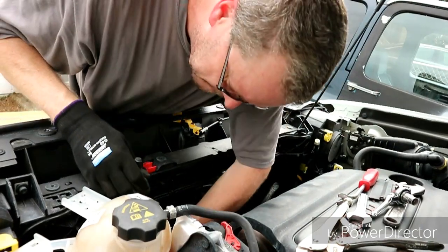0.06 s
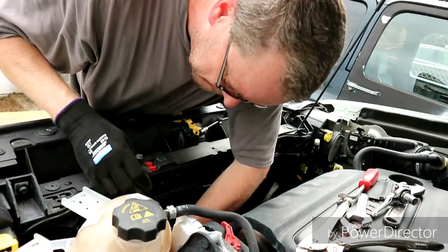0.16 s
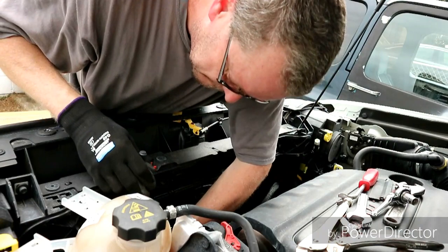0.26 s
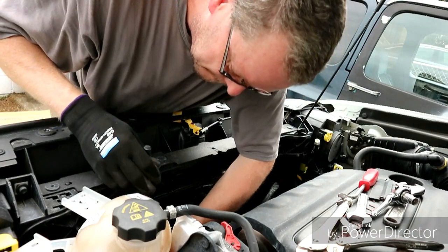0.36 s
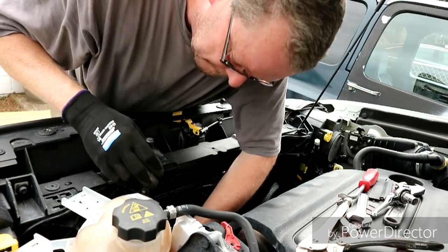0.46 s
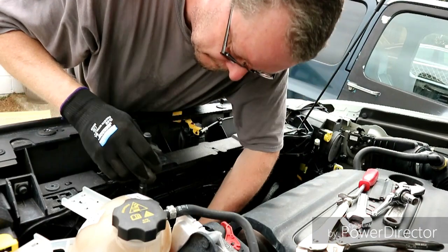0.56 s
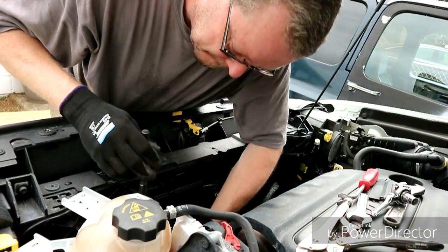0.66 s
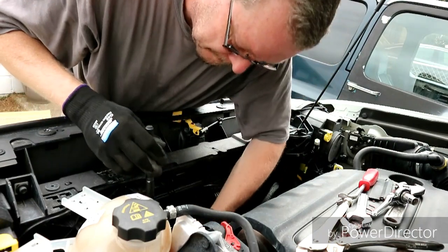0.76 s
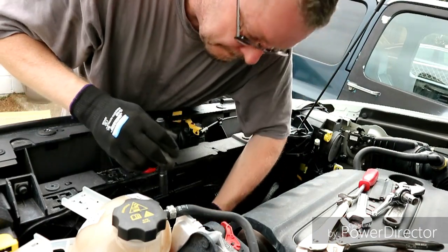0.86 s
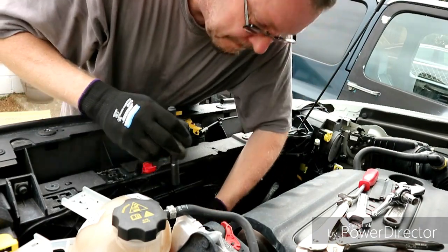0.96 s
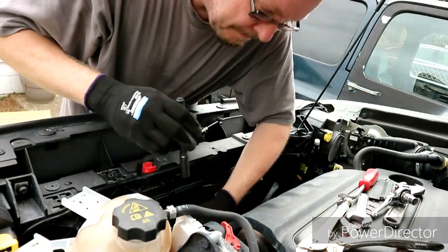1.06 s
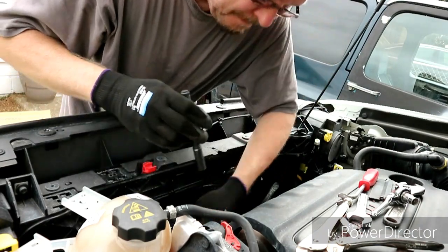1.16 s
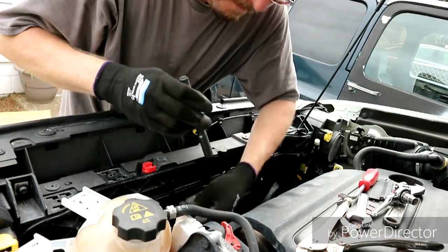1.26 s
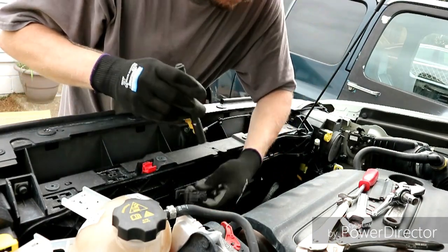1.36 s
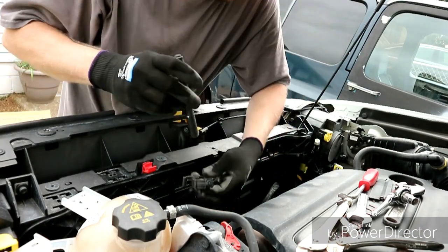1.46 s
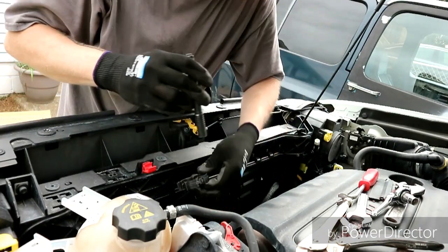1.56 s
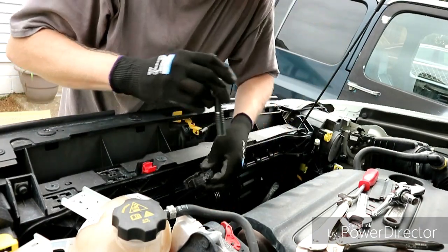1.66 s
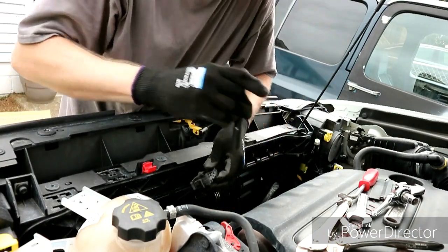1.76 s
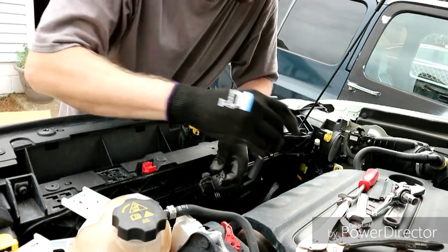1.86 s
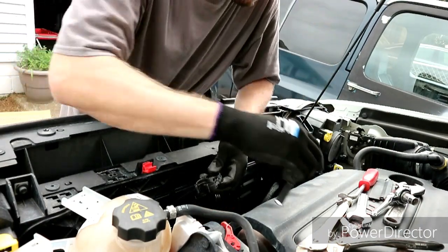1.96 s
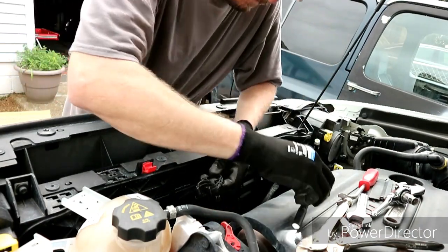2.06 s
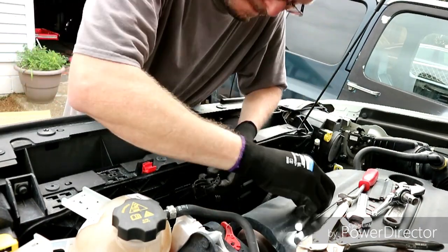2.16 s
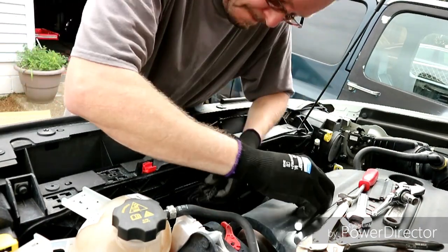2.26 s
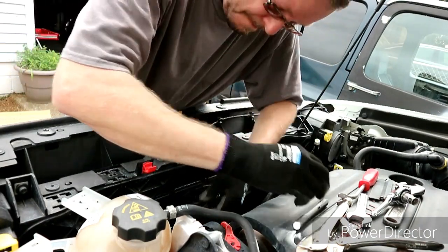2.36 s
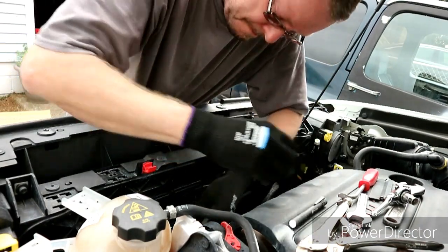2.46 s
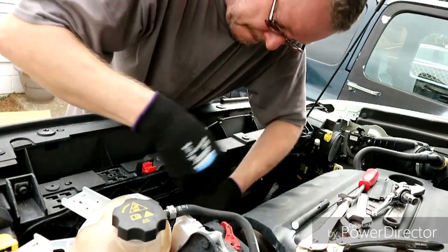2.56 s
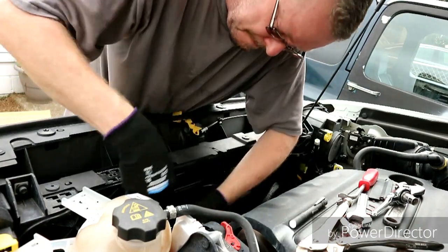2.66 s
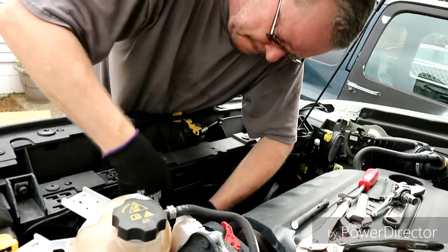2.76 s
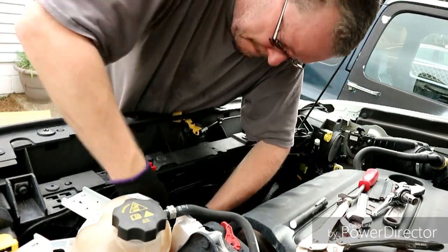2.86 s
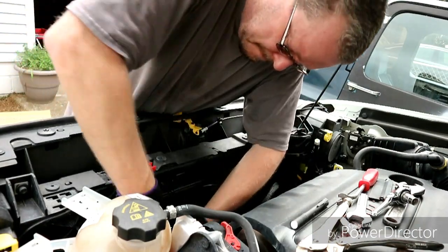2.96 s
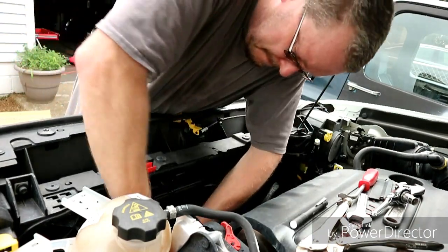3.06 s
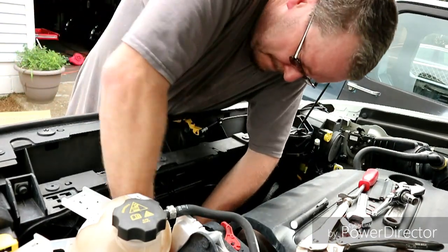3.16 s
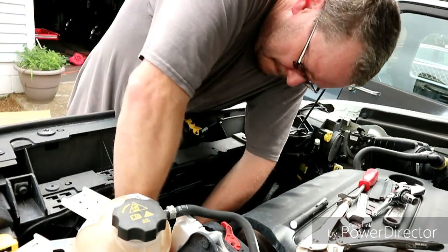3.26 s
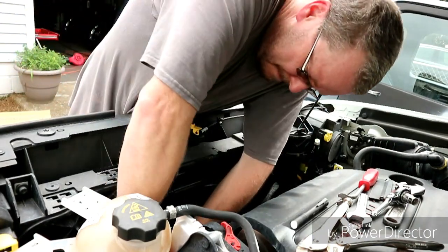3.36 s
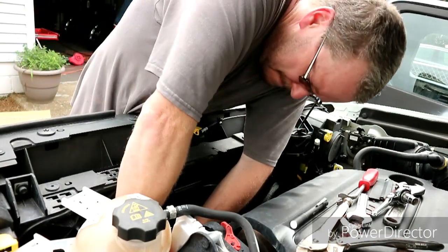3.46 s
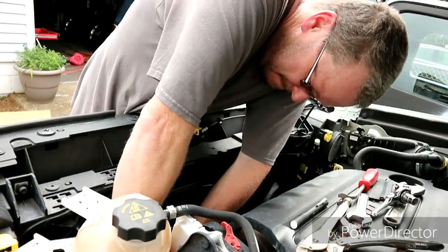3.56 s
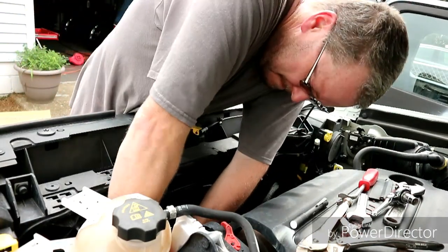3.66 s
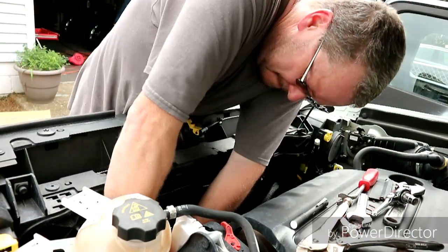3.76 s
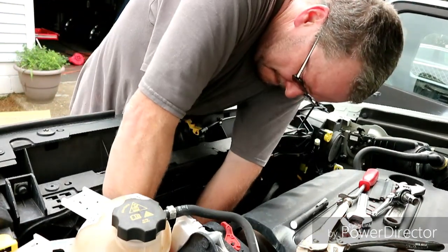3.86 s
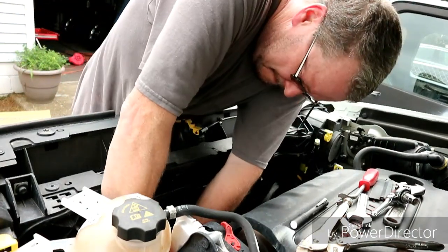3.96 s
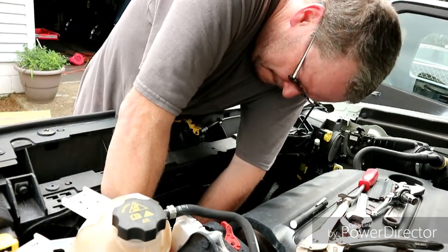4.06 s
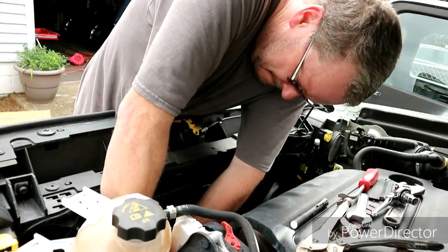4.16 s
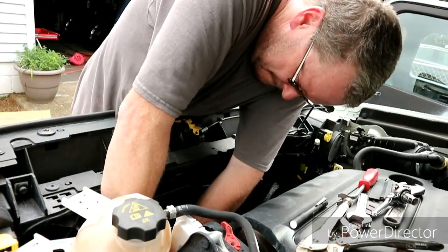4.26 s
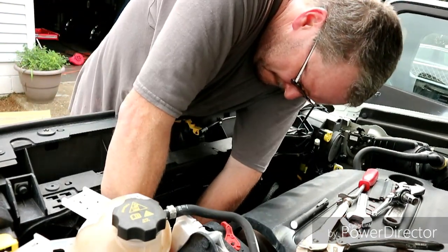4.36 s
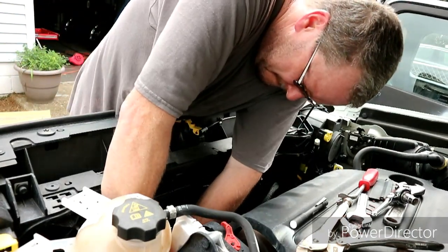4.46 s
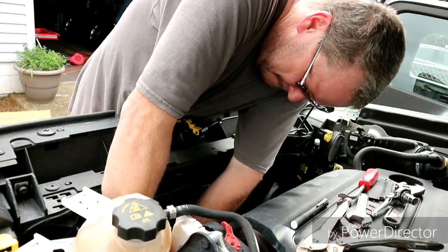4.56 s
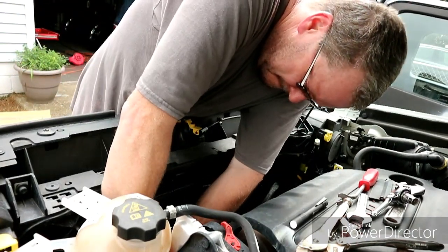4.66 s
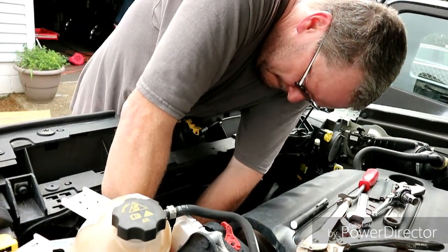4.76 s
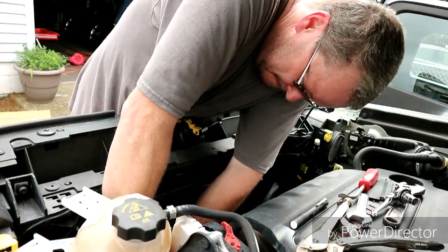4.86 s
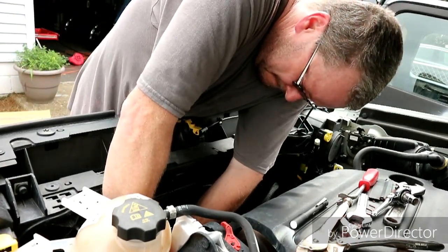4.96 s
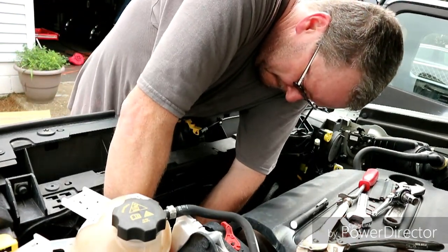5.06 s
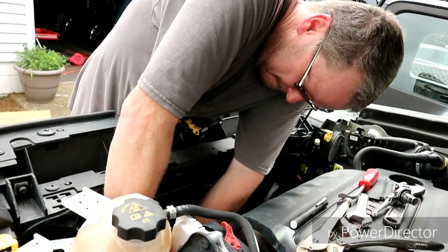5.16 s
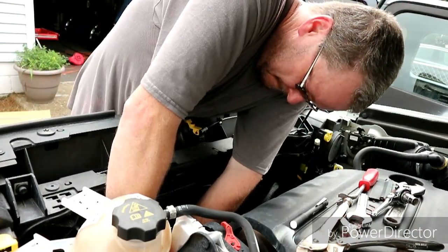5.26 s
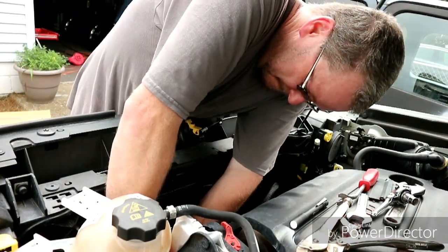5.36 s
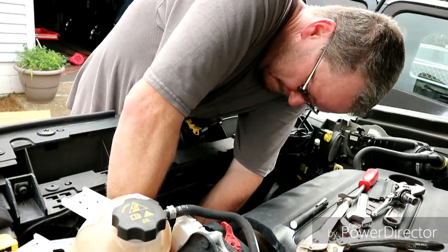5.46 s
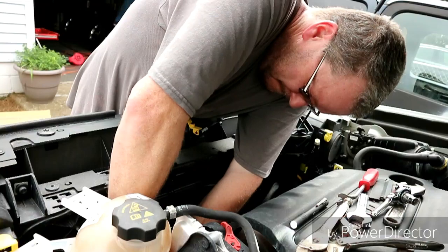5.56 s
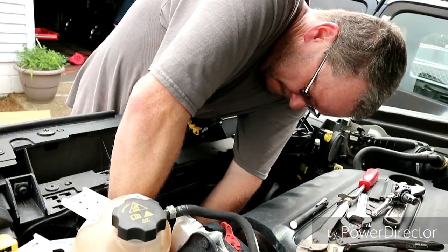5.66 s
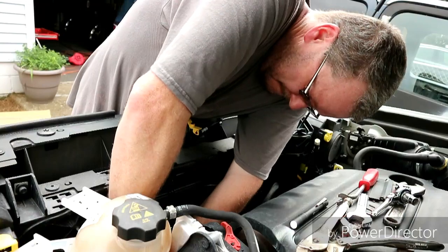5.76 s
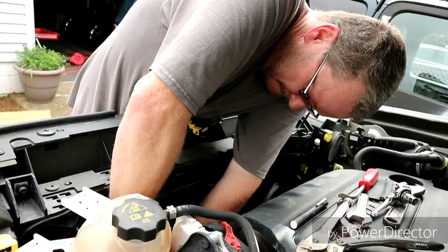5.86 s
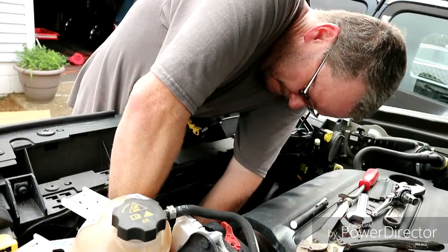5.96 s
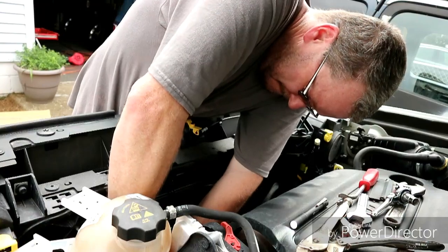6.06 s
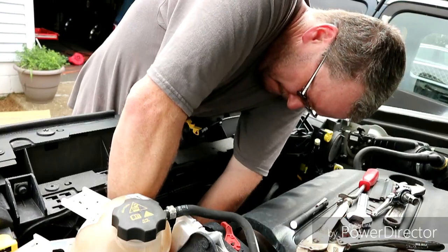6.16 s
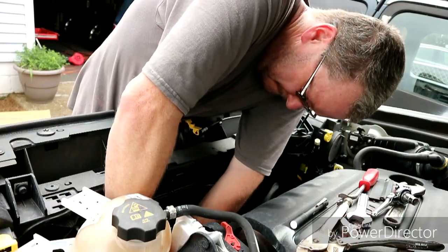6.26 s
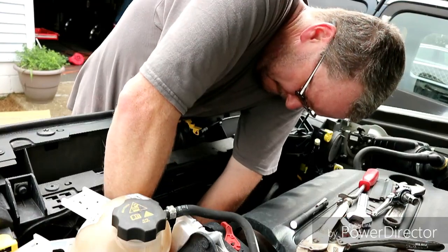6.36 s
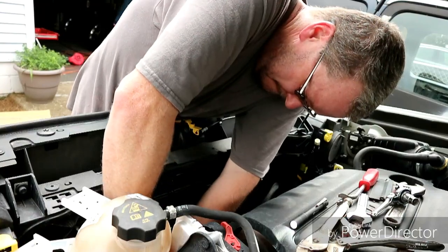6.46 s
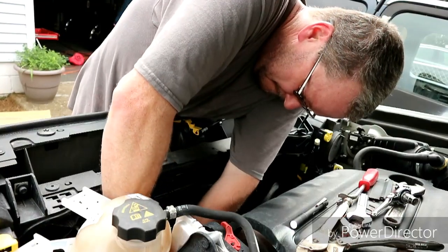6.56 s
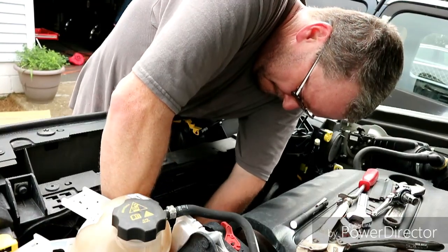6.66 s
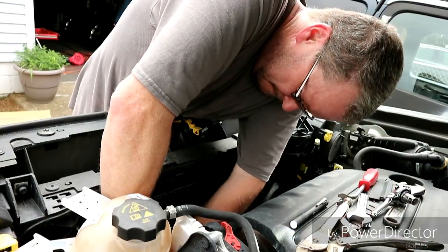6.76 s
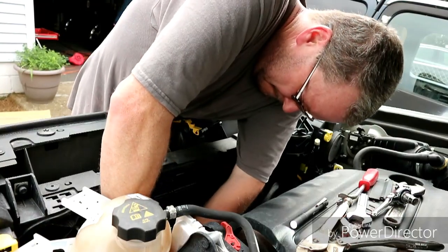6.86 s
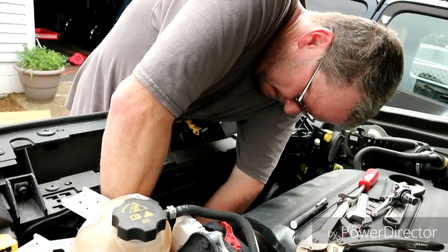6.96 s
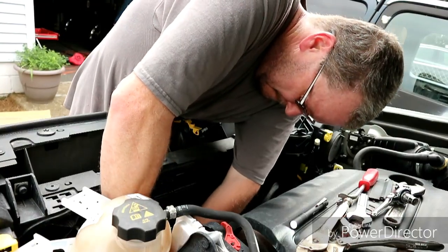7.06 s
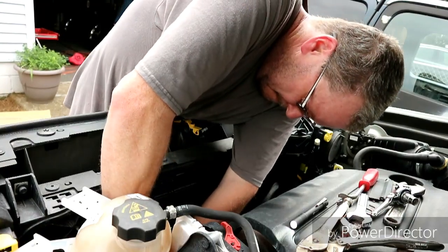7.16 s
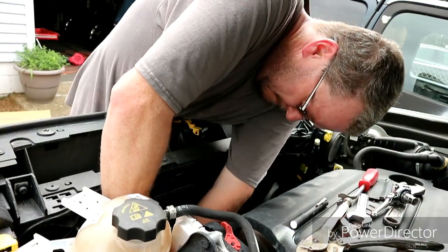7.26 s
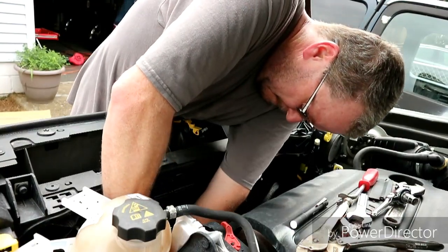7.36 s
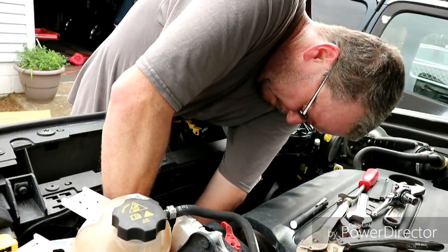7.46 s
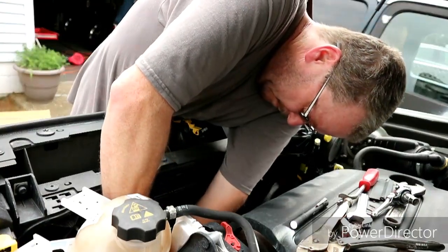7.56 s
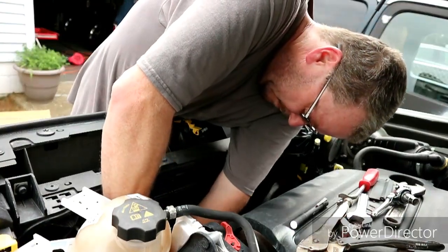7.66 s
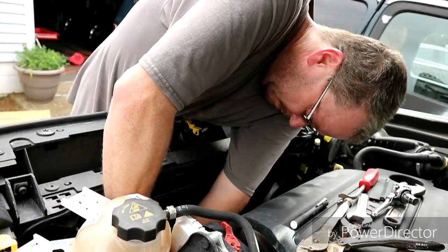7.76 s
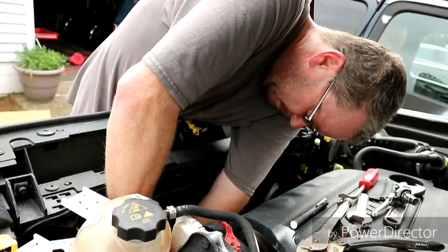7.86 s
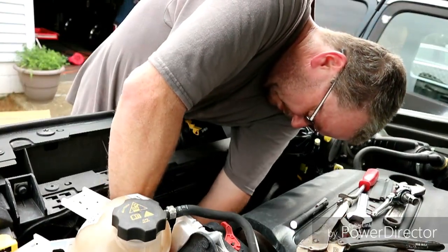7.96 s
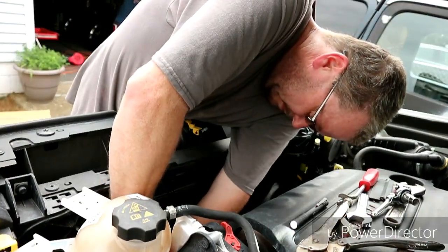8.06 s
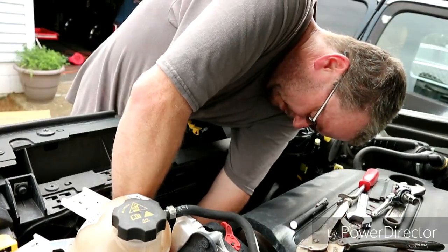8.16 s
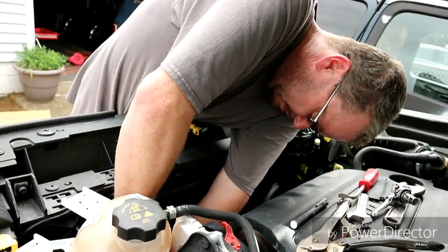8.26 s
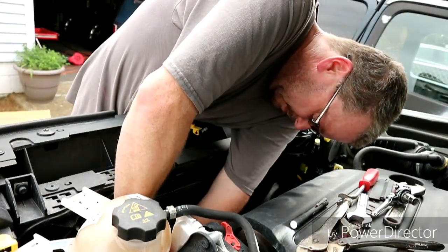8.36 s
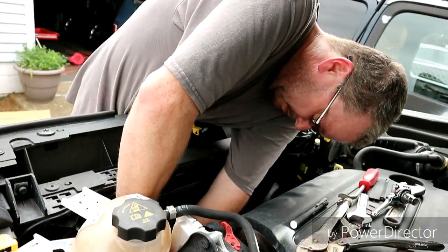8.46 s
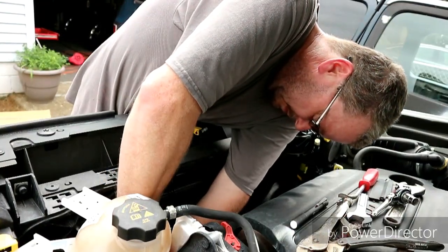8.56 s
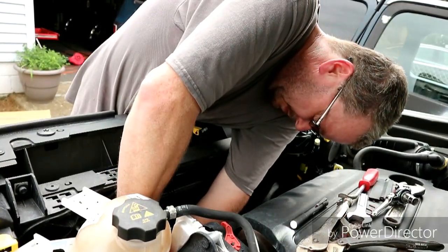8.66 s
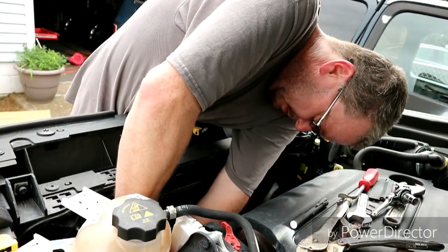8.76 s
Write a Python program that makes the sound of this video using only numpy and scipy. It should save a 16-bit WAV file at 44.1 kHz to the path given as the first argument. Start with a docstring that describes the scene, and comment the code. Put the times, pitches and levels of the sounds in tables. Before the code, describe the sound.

A close cicada buzzes steadily outdoors while gloved hands knock plastic clips in an engine bay and a steel socket clatters onto a plastic cover.

```python
"""The engine bay of a car in a suburb: a cicada buzzes close by, as trains of clicks ringing a hollow body.
Behind it lie a distant insect chorus, two crickets, far bird whistles, a low hum and thin hiss, from noise and tones.
Close up, gloved hands knock plastic clips and a steel socket drops on a plastic cover, as contacts that ring modes.
The drop overloads the camera microphone, and its gain control ducks the scene for about a second."""
import sys
import numpy as np
from scipy import signal
from scipy.fft import rfft, irfft, next_fast_len
from scipy.io import wavfile
from scipy.ndimage import uniform_filter1d, map_coordinates

SR = 44100
rng = np.random.default_rng(int(sys.argv[2]) if len(sys.argv) > 2 else 0)


def inscribe(sig):
    """Save sig as 16-bit PCM at rate SR to the path in sys.argv[1].

    A 1-D sig is mono; a 2-D sig holds one channel per row.
    Samples are clipped to [-1, 1] before scaling.
    """
    pcm = np.round(np.clip(np.atleast_2d(sig).T, -1, 1) * 32767)
    wavfile.write(sys.argv[1], SR, pcm.astype(np.int16))


N = 388521

# Level of the close cicada between its rests. Each row: time in seconds, level in dB.
CICADA_LEVEL = [(0, -35.5), (1.8, -35.5), (2.6, -39), (4.1, -38), (6.2, -38), (8.82, -36.5)]
# Short rests in its song. Each row: middle in seconds, length in seconds.
SONG_RESTS = [(.033, .014), (.414, .008), (.799, .017), (1.165, .027), (1.543, .018), (1.916, .018),
              (2.303, .014), (2.671, .024), (3.06, .018), (3.447, .021), (3.84, .015), (4.241, .013),
              (4.636, .02), (5.039, .024), (5.469, .018), (5.932, .015), (6.409, .024), (7.005, .021)]
# Modes of the cicada's drum and hollow belly. Each row: frequency in Hz, nominal width in Hz,
# relative level early in dB, relative level late in dB.
BELLY_MODES = [(2160, 300, -14.5, -14), (2315, 77, -10, -6.5), (2430, 72, -8, -7.5), (2553, 41, -7, -7),
               (2603, 83, -15, -21.5), (2754, 96, -12, -6.5), (2895, 32, -1, -4.5), (2954, 40, -2.5, -3),
               (3063, 44, 2.5, 1), (3122, 34, -5, 0.5), (3174.5, 39, 0.5, -2), (3312, 25, -11, -4.5),
               (3430, 150, -21, -15), (3460, 50, -6, -11.5), (3554, 34, -11, -12.5),
               (3633, 37, -12.5, -12.5), (3800, 340, -22.5, -25.5), (4400, 160, -31, -28),
               (4790, 380, -27, -31)]
# Knocks on plastic, close up. Each row: start in seconds, peak of the thud in dB, of the clack in dB,
# of the snap in dB, clack frequency in Hz, thud frequency in Hz, width of the clack in octaves.
PLASTIC_KNOCKS = [(.143, -30, -38, -35, 1220, 440, .5), (.164, -27.5, -45, -33, 1130, 440, .5),
                  (.183, -18.5, -18.5, -35.5, 1496, 503, 1.3), (.209, -32, -32, -62, 1570, 524, .4),
                  (.272, -45, -50, -57, 1200, 333, .5), (.366, -41, -53, -57, 1190, 500, 0.54),
                  (.554, -39, -34, -35, 1040, 656, 0.66), (.577, -54, -35, -42, 1600, 610, .4),
                  (.649, -51, -32.5, -50, 1570, 600, .3), (.668, -42, -42, -55, 1200, 680, .4),
                  (.704, -51, -26.5, -29.5, 1550, 460, .7), (.882, -20, -16, -17, 1360, 400, 0.78),
                  (.894, -28, -30, -31, 1590, 400, .6), (.987, -29, -25.5, -28, 1350, 430, 0.67),
                  (1.046, -77, -31.5, -40, 1300, 700, .6), (1.242, -76, -38.5, -49, 1440, 497, .15),
                  (1.344, -62, -33, -52, 1160, 500, .15), (2.755, -53, -32, -57, 1480, 490, .6),
                  (2.887, -32, -39, -33, 1180, 630, .6), (2.898, -27, -27, -34, 1040, 417, .2),
                  (2.925, -30, -53, -50, 950, 850, .2), (3.189, -46, -33, -52, 1620, 500, 0.55),
                  (3.225, -32.5, -36, -49, 1490, 596, .5), (3.26, -46.5, -27, -47, 1800, 423, .5),
                  (3.374, -37, -35, -54, 1070, 550, .3), (3.397, -34, -33, -52, 1060, 530, .3),
                  (3.435, -35, -34, -30, 1300, 424, .5), (3.499, -33.5, -42, -38, 1300, 385, .5),
                  (3.56, -39, -40, -39, 1530, 390, .5), (3.829, -35.5, -35.5, -41, 1730, 446, 0.45),
                  (4.201, -23, -24.5, -47, 1340, 400, 0.53), (4.369, -49, -37, -40.5, 1590, 435, .3),
                  (4.519, -33.5, -40, -54, 1060, 550, .4), (4.838, -35, -59, -55.5, 1200, 497, 0.37),
                  (5.144, -30.5, -24.5, -47, 1440, 400, .45), (5.158, -40, -33, -54, 1230, 480, .9),
                  (5.318, -37, -51, -50, 1200, 495, .4), (5.387, -35, -35, -56, 1040, 527, .12),
                  (5.457, -34.5, -30, -52, 1050, 565, .8), (5.464, -44, -38, -55, 1750, 554, .3),
                  (5.48, -37, -49, -55, 1200, 590, .4), (5.538, -40, -37, -37, 1640, 504, .3),
                  (5.59, -35, -22, -50, 1200, 400, 0.7), (5.594, -30, -23, -52, 1550, 190, .5),
                  (5.685, -28, -22, -65, 1140, 532, .2), (5.714, -49, -32, -46, 1440, 500, 0.35),
                  (5.79, -38, -29.5, -51, 1250, 377, .35), (5.832, -37, -38, -65, 1240, 570, .3),
                  (6.601, -37, -30, -52, 1130, 387, .4), (6.645, -37, -38, -61, 1090, 380, .4),
                  (7.07, -39, -32, -39, 1160, 460, .4), (8.336, -56, -29, -48, 2430, 500, .1),
                  (8.352, -46, -22.5, -40, 2420, 530, .12), (8.359, -51, -37, -56, 1300, 504, .4),
                  (8.377, -38.5, -24, -40, 1470, 630, .45), (8.381, -45, -24, -45, 1800, 646, 0.34),
                  (8.617, -56, -37, -54, 1090, 420, .3)]
# Modes of clips and hoses, before detuning and damping. Each row: frequency in Hz, relative level in dB,
# time to fall by 60 dB in seconds.
PLASTIC_MODES = [(317, -2, 0.1), (398, 4.5, 0.053), (461, 17, 0.034), (552, -2.5, 0.1), (671, -2, 0.099),
                 (817, -28, 0.029), (1040, -13, 0.026), (1160, 5, 0.057), (1264, 8, 0.028),
                 (1466, -0.5, 0.058), (1650, 5, 0.049), (1947, 5, 0.045), (2193, 0.5, 0.046),
                 (2505, 3, 0.033), (2530, 4, 0.02), (3120, 11, 0.013), (3780, 5.5, 0.012),
                 (4080, 4, 0.0092), (4780, -3.5, 0.0097), (5540, 0.5, 0.012), (6270, -1, 0.014),
                 (8200, -33, .01), (11200, -9.5, 0.0054), (12500, -14.5, .006)]
# The socket lands, tips over and rocks. Each row: start in seconds, peak of the thud in dB, of the clack in dB,
# of the snap in dB, clack frequency in Hz, thud frequency in Hz, width of the clack in octaves.
SOCKET_DROPS = [(2.1907, -6.5, 0.5, -8.5, 2310, 444, 1.7), (2.2542, -8.5, 7.5, 4, 2340, 195, 1.6),
                (2.245, -30, -40, -31, 2300, 450, 1.), (2.276, -16.5, -21, -29, 1820, 456, 1.2),
                (2.282, -34, -27, -28, 2325, 455, 0.85), (2.397, -20, -21, -51, 1190, 446, 0.67),
                (2.511, -23, -24, -49, 1196, 450, 0.63), (2.568, -32.5, -35, -53, 1380, 460, 0.82)]
# Modes of socket on cover, before detuning and damping. Each row: frequency in Hz, relative level in dB,
# time to fall by 60 dB in seconds.
COVER_MODES = [(190, 3.5, 0.11), (290, -1, 0.14), (400, -2, 0.13), (454, -6, 0.17), (570, -2, 0.085),
               (670, 2.5, 0.077), (822, -2.5, 0.093), (873, -3.5, 0.06), (1173, 3.5, 0.05),
               (1300, -0.5, 0.055), (1360, 0.5, 0.027), (1482, 1.5, 0.044), (1798, 3.5, 0.04),
               (1860, -5.5, 0.054), (2090, -8.5, 0.058), (2310, 8.5, 0.018), (2570, 0, 0.03),
               (2804, -6, 0.0042), (3120, 1.5, 0.015), (3450, -7, 0.01), (3800, -5.5, 0.018),
               (4380, -3, .014), (4830, -9, 0.011), (5350, -6.5, 0.0089), (6100, -2.5, 0.01),
               (7150, -8.5, 0.0041), (8000, -13, 0.0063), (9570, -11.5, 0.0085), (11100, -14, 0.0095),
               (13400, -17, .003)]
# Gloves and sleeves rub over parts. Each row: start in seconds, length in seconds,
# level before the swell and fade in dB, centre in Hz, octaves from the centre to either edge.
GLOVE_RUBS = [(0.132, 0.088, -38.5, 900, 1.8), (0.552, 0.21, -53, 1490, 1.2),
              (2.271, 0.13, -36.5, 448, 0.61), (2.928, 0.15, -48.5, 1650, .12),
              (2.515, 0.072, -36, 500, 0.45), (2.849, 0.094, -37.5, 900, 1.66),
              (3.15, 0.17, -41, 1270, 1.13), (3.358, 0.079, -40, 1200, 1.2),
              (3.543, 0.068, -59.5, 5090, 0.64), (3.782, 0.26, -46, 1530, 0.91),
              (5.731, 0.068, -47, 1300, 0.38), (6.555, 0.057, -46.5, 1300, 0.6)]
# A knee against the body panel. The row: start in seconds, level before the build-up in dB,
# frequency in Hz, time to fall by 60 dB in seconds.
KNEE_BUMP = (.012, -13, 155, .11)
# Far bird whistles. Each row: start in seconds, length in seconds, level before the swell in dB, first pitch in Hz,
# top pitch in Hz, last pitch in Hz, place of the top from 0 to 1.
BIRD_WHISTLES = [(2.6, .15, -50, 3420, 3420, 3380, .3), (3.55, .29, -45, 3590, 3670, 3230, .15),
                 (4.055, .23, -42.5, 3440, 3440, 3260, .25), (7.534, .042, -44.5, 3500, 4680, 3900, .72)]
# Distant crickets. Each row: frequency in Hz, width to either side in Hz, level in dB, rise in dB per second,
# left minus right in dB.
CRICKET_BANDS = [(4370, 130, -72, .7, 0), (4640, 200, -69, 0, 2)]
# Colour of air and traffic, alike in both ports. Each row: frequency in Hz, relative level per Hz in dB.
HUM_COLOUR = [(20, -30), (40, -6), (60, 0), (90, 2), (170, -6), (300, -11.5), (550, -15.5), (850, -22.5),
              (1200, -21.5), (1700, -24.5), (4000, -31), (6000, -42), (8300, -47), (9500, -69.5)]
# Level of that hum. Each row: time in seconds, level in dB.
HUM_LEVEL = [(0, -38.5), (2, -39), (2.7, -40), (3.7, -39.5), (4.3, -39.5), (5, -39.5), (5.8, -40.5),
             (6.5, -39), (8.82, -39.5)]
# Colour of the microphone hiss, opposite in the ports. Each row: frequency in Hz, relative level per Hz in dB.
HISS_COLOUR = [(24, -93), (40, -45), (106, -36.5), (212, -18), (773, -22), (1890, -26), (2430, -18),
               (3110, -6.5), (3890, -19), (4520, -19.5), (5520, -27), (6250, -29.5), (15300, -42)]

CHORUS_DB, HISS_DB = -48.5, -51
# The beat slows late on; every second buckle is weaker.
BUCKLES_PER_S, TIRES_AT_S, SAG_PER_S2, WEAK_DB = 164, 7, 2.5, -4
REST_DB, RESTART_DB, RESTART_S = -12.5, 2, .03  # after each rest it starts again with an accent
TURN_S, TURN_TAKES_S = 4, 0.74  # the colour of the song changes over around this time
SHIMMER, SHIMMER_S = .9, .12  # the colour wanders to and fro between the two
WAVER_S, WAVER_SPAN_S = .00011, .07  # the path length wavers, and the pitch with it
CRACK_DB, CRACK_HZ = 3, (500, 5000)  # the bare contact, against the mean of clack and snap
CHEEP_SWELL_DB = 6  # a whistle starts this much softer
OCTAVE_DB, FLUTTER_DB = -25, 1.5  # a whistle's faint overtone, and its unsteady strength on the way
EDGE_HZ = 16300  # upper limit of the microphone channel


def gain_of(db):
    """Decibels to amplitude."""
    return 10 ** (np.asarray(db) / 20)


def evened(x):
    """Scales to rms 1."""
    return x / np.sqrt(np.mean(x ** 2) + 1e-20)


def colour(x, points):
    """Filters by a (Hz, dB) table, straight lines over log frequency."""
    size = next_fast_len(N)
    table_hz, table_db = np.transpose(points)
    f = np.fft.rfftfreq(size, 1 / SR)
    shape = gain_of(np.interp(np.log(f + 1), np.log(table_hz), table_db, -90, -90))
    return irfft(rfft(x, size) * shape, size)[..., :N]


def smoothed(x, span):
    """Two moving averages in a row."""
    return uniform_filter1d(uniform_filter1d(x, span), span)


def drift(seconds, count=1):
    """Slow random wander of rms 1."""
    span = max(int(seconds * SR), 2)
    return evened(smoothed(rng.standard_normal((count, N)), span))


def bandpass(x, edges):
    """Keeps the band between two edges in Hz."""
    return signal.sosfilt(signal.butter(3, edges, "band", fs=SR, output="sos"), x)


def add(mix, s, sound):
    """Mixes a sound in at a time in seconds."""
    part = mix[:, round(s * SR):][:, :sound.shape[1]]
    part += sound[:, :part.shape[1]]


def cicada(jitter=.016, breathy=.22, sharp=1.4, uneven_db=1.2, blur_s=.008, left_db=2.5, lead=1.5):
    """Two drums buckle in turn, slightly off the beat; each click comes with a puff of finer random clicks."""
    t = np.arange(N) / SR
    level_db = np.interp(t, *np.transpose(CICADA_LEVEL))
    rate = BUCKLES_PER_S - SAG_PER_S2 * np.maximum(t - TIRES_AT_S, 0)
    turns = np.cumsum(rate) / SR + jitter * drift(.005)[0]  # count of buckles so far
    clicks = np.diff(np.maximum.accumulate(np.floor(turns)), prepend=0)
    weak_turn = np.floor(turns + .5) % 2
    strength = gain_of(WEAK_DB * weak_turn + uneven_db * drift(0.0049)[0])
    puffs = np.exp(sharp * np.cos(2 * np.pi * turns)) * rng.standard_normal(N)
    drive = strength * ((1 - breathy) * evened(clicks) + breathy * evened(puffs))

    singing_db = np.zeros(N)
    for middle, length in SONG_RESTS:
        singing_db += REST_DB * np.exp(-((t - middle) / (length / 2)) ** 4)
        since = np.maximum(t - middle - length / 2, 0)
        singing_db += RESTART_DB * (since > 0) * np.exp(-since / RESTART_S)

    echoes = rfft(rng.standard_normal(4000) * np.exp(-t[:4000] / blur_s), next_fast_len(N))
    blur = echoes / abs(echoes)  # close echoes smear the pulses of the outer modes
    shimmer = SHIMMER * drift(SHIMMER_S)[0]
    left = gain_of(left_db) * belly(drive, lead, blur, shimmer)
    right = belly(drive, 0, blur, shimmer)
    place = np.arange(N) + SR * WAVER_S * drift(WAVER_SPAN_S)[0]
    pair = np.array([map_coordinates(port, [place], order=3, mode="nearest") for port in (left, right)])
    return gain_of(level_db + singing_db) * evened(pair)


def belly(x, lead=0., blur=1.0, shimmer=0.):
    """Rings the cicada's modes, neighbours in opposite phase, early colour to late; lead in samples."""
    size = next_fast_len(N)
    f = np.fft.rfftfreq(size, 1 / SR)
    rings = np.array([(-1) ** k / (1 + 2j * (f - row[0]) / row[1]) ** 1.46
                      for k, row in enumerate(BELLY_MODES)])
    path = np.where((f < 2670) | (f > 3750), blur, 1) * np.exp(2j * np.pi * f * lead / SR)
    arriving = rfft(x, size) * path
    early_db, late_db = np.transpose(BELLY_MODES)[2:]
    early = irfft(arriving * (gain_of(early_db) @ rings), size)[..., :N]
    late = irfft(arriving * (gain_of(late_db) @ rings), size)[..., :N]
    turned = .5 + .5 * np.tanh((np.arange(N) / SR - TURN_S) / TURN_TAKES_S + shimmer)
    return (1 - turned) * early + turned * late


def knock(row, modes, spread, chatter, ring, own_db, own_t60, tail_db, tail_s,
          scatter_db=-6, scatter_s=0.012, left_db=0.4):
    """A sharp contact and its chatter ring the struck part and modes near it; the engine bay scatters the sound."""
    s, thud_db, clack_db, snap_db, clack_hz, thud_hz, reach = row
    hz, db, t60 = np.transpose(modes)[:, :, None]
    t = np.arange(5000) / SR
    detune, turn = rng.uniform(-1, 1, (2, len(modes) + 2, 1))

    # modes far from the struck part's thud and clack are softer
    middle = (hz > 900) & (hz < 2900)
    db = db - middle * 1.6 * (np.log2(hz / clack_hz) / reach) ** 2
    db = db - (hz <= 900) * 2.9 * np.log2(hz / thud_hz) ** 2
    # the struck part adds two modes of its own
    hz = np.append(hz * (1 + spread * detune[2:]), [[thud_hz], [clack_hz]], 0)
    db = np.append(db, [[own_db]] * 2, 0)
    t60 = np.append(ring * t60, [[2.05 * own_t60], [own_t60]], 0)

    first, later = rng.standard_normal((2, len(t)))
    contacts = first ** 3 * np.exp(-t / max(chatter, 2e-4))
    contacts = contacts / np.linalg.norm(contacts) + 1.8 * (t == 0)
    skew = (.98 + .3 * turn) * np.minimum(hz / 6500, 1) ** 1.4  # the ports drift out of phase toward the treble
    fading = (1 - np.exp(-t * hz)) ** 2 * gain_of(db - 60 * t / t60)  # each mode builds up over a cycle
    rings = np.array([fading * np.sin(2 * np.pi * hz * t + side * skew) for side in (1, -1)])

    sound = np.zeros((2, len(t)))
    group = np.digitize(hz[:, 0], (900, 2900))  # thud, clack, snap
    decays_s = np.array([[scatter_s], [tail_s]])
    for k, (level_db, linger) in enumerate([(thud_db, 1.3), (clack_db, 1.), (snap_db, .8)]):
        # treble is soaked up first
        near, far = np.exp(-t / (linger * decays_s)) * (1 - np.exp(-t / 0.0035)) * later
        drive = contacts + gain_of(scatter_db) * near / np.linalg.norm(near)
        drive = drive + gain_of(tail_db) * far / np.linalg.norm(far)
        part = signal.fftconvolve(rings[:, group == k].sum(1), drive[None])[:, :len(t)]
        sound += gain_of(level_db) * part / abs(part).max()

    crack = bandpass(drive - (t == 0), CRACK_HZ)  # the bare contact, its first instant reduced
    crack = gain_of((clack_db + snap_db) / 2 + CRACK_DB) * crack / abs(crack).max()
    sound += [crack, np.roll(crack, 2)]  # the right port hears it two samples later
    return s, sound * gain_of([[left_db], [0]])


def plastic_knock(row):
    """Clips and hoses are loosely fixed: their modes scatter in pitch and are well damped."""
    return knock(row, PLASTIC_MODES, spread=0.049, chatter=0.0027, ring=0.65,
                 own_db=9, own_t60=0.023, tail_db=-13, tail_s=0.012)


def socket_drop(row):
    """The steel socket rings the cover at nearly fixed pitches, with a longer tail from the bay."""
    return knock(row, COVER_MODES, spread=0.004, chatter=0.0018, ring=0.79,
                 own_db=6, own_t60=0.016, tail_db=-13.5, tail_s=0.028,
                 scatter_db=-8, scatter_s=.004, left_db=-.4)


def rub(row, grain_db=5.5):
    """Grainy friction noise in one band, swelling and fading."""
    s, length, db, centre_hz, octaves = row
    size = int(length * SR)
    grains = rng.standard_normal((2, 8000))
    clumps = gain_of(grain_db * evened(uniform_filter1d(grains[1], 90)))
    edges = np.clip(centre_hz * 2. ** np.array([-octaves, octaves]), 50, 15000)
    band = bandpass(grains[0] * clumps, edges)[:size]
    return s, gain_of(db) * evened(band) * np.hanning(len(band)) * np.ones((2, 1))


def bump():
    """A soft push swells and fades in a wide panel."""
    s, db, hz, t60 = KNEE_BUMP
    t = np.arange(9000) / SR
    envelope = gain_of(db - 60 * t / t60) * (1 - np.exp(-t / 0.0058)) ** 2
    return s, envelope * np.sin(2 * np.pi * hz * t) * np.ones((2, 1))


def cheep(row):
    """A far whistle that swells up, glides to its top and falls, quickly at first."""
    s, length, db, first_hz, top_hz, last_hz, top = row
    u = np.arange(0, 1, 1 / (length * SR))
    climb = np.sin(np.pi / 2 * np.minimum(u / top, 1)) ** 2
    fall = np.clip((u - top) / (1 - top), 0, 1) ** .85
    pitch_hz = first_hz + (top_hz - first_hz) * climb + (last_hz - top_hz) * fall
    phase = 2 * np.pi * np.cumsum(pitch_hz) / SR
    tone = np.sin(phase) + gain_of(OCTAVE_DB) * np.sin(2 * phase)
    tone *= signal.windows.tukey(len(u), .3)
    flutter = evened(uniform_filter1d(rng.standard_normal(20000), 900))[:len(u)]
    level_db = db - CHEEP_SWELL_DB * (1 - u) ** 2 + FLUTTER_DB * flutter
    return s, gain_of(level_db) * tone * np.array([[1.15], [.85]])  # a little to the left


def chorus(apart=.5, swell_db=1.):
    """Many far cicadas blur into noise of the near one's colour, partly different in the two ports."""
    common, left, right = rng.standard_normal((3, N))
    blurred = evened(belly(np.array([common + apart * left, common + apart * right])))
    return blurred * gain_of(CHORUS_DB + swell_db * drift(0.15))


def crickets(waver_db=3.5):
    """Distant crickets are narrow bands of noise that waver in level."""
    out = np.zeros((2, N))
    for hz, width, db, rise_db, pan_db in CRICKET_BANDS:
        points = [(hz - width, -30), (hz, 0), (hz + width, -30)]
        band = evened(colour(rng.standard_normal((2, N)), points))
        level_db = db + rise_db * np.arange(N) / SR + waver_db * drift(0.082)
        out += band * gain_of(level_db + pan_db * np.array([[.5], [-.5]]))
    return out


def air(swell_db=.5, patchy_db=1.6):
    """A low hum in drifting patches reaches both ports alike; the thin hiss is opposite in the two."""
    z = signal.stft(colour(rng.standard_normal(N), HUM_COLOUR), nperseg=1024)[2]
    patches = uniform_filter1d(rng.standard_normal(z.T.shape).T, size=12, axis=0)  # over frequency
    patches = evened(uniform_filter1d(patches, size=10, axis=1))  # over time
    hum = evened(signal.istft(z * gain_of(patchy_db * patches), nperseg=1024)[1][:N])
    level_db = np.interp(np.arange(N) / SR, *np.transpose(HUM_LEVEL))
    hum *= gain_of(level_db + swell_db * drift(0.037)[0])
    hiss = evened(colour(rng.standard_normal(N), HISS_COLOUR)) * gain_of(HISS_DB)
    return np.array([hum + hiss, hum - hiss])


def scene():
    """Insects and air, with the hands' work and the birds on top."""
    mix = cicada() + chorus() + crickets() + air()
    for row in PLASTIC_KNOCKS:
        add(mix, *plastic_knock(row))
    for row in SOCKET_DROPS:
        add(mix, *socket_drop(row))
    for row in GLOVE_RUBS:
        add(mix, *rub(row))
    add(mix, *bump())
    for row in BIRD_WHISTLES:
        add(mix, *cheep(row))
    return mix


def record(dry, knee_db=-24, share=0.55, recover_db=16.0, lag_s=0.035):
    """Gain control reacts late to loud hits and recovers slowly; peaks clip; then the band limits."""
    power = abs(uniform_filter1d((dry ** 2).mean(0), 440, origin=219))
    power_db = 10 * np.log10(power + 1e-12)
    fall = np.arange(N) * recover_db / SR  # recover_db is per second
    held_db = np.maximum.accumulate(power_db + fall) - fall
    over_db = np.maximum(held_db - knee_db, 0)
    keep = np.exp(-1 / (lag_s * SR))
    late_db = over_db
    for _ in range(2):  # two lags in a row
        late_db = signal.lfilter([1 - keep], [1, -keep], late_db)
    clipped = np.clip(dry / gain_of(share * late_db), -1, 1)
    input_coupling = signal.butter(2, 35, "high", fs=SR, output="sos")
    coupled = signal.sosfilt(input_coupling, clipped)
    band_limit = signal.firwin(511, EDGE_HZ, window=("kaiser", 9), fs=SR)
    return signal.oaconvolve(coupled, band_limit[None], "same")


dry = scene()
out = record(dry)
inscribe(out)
```